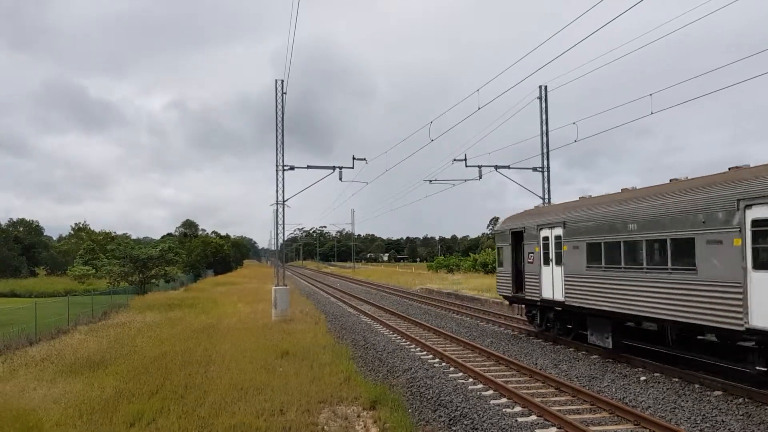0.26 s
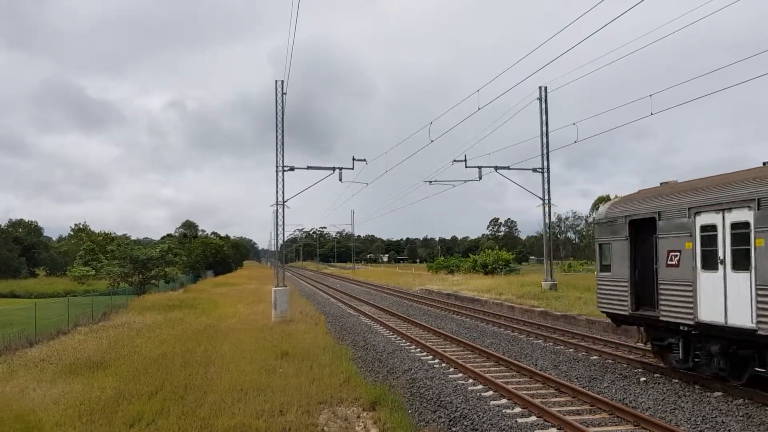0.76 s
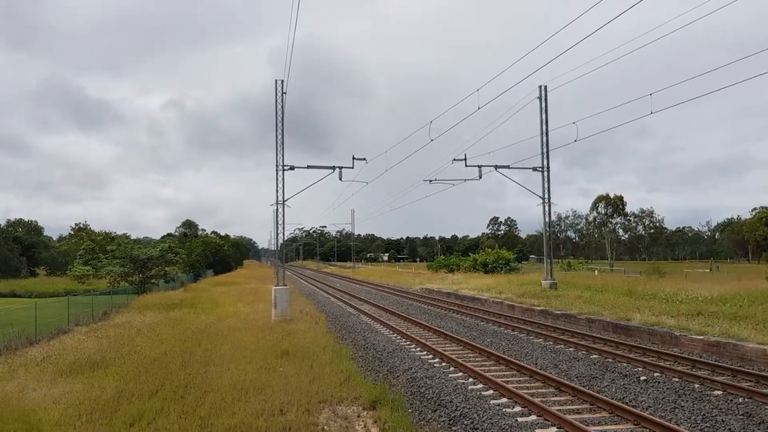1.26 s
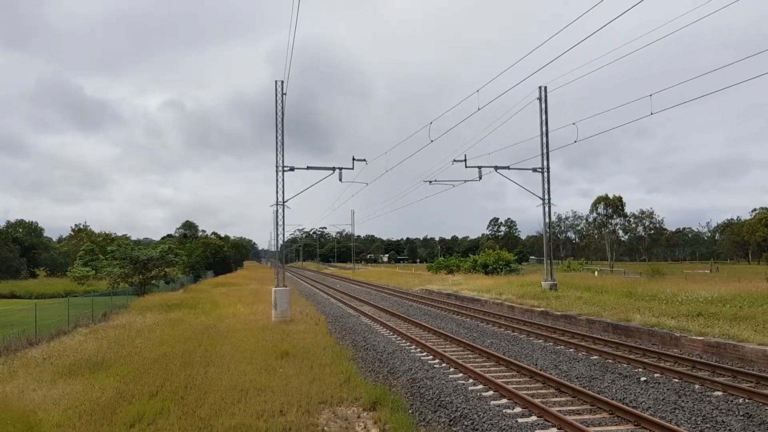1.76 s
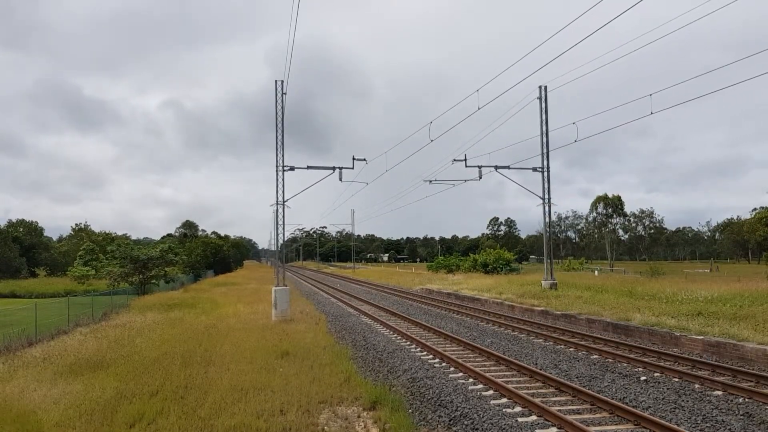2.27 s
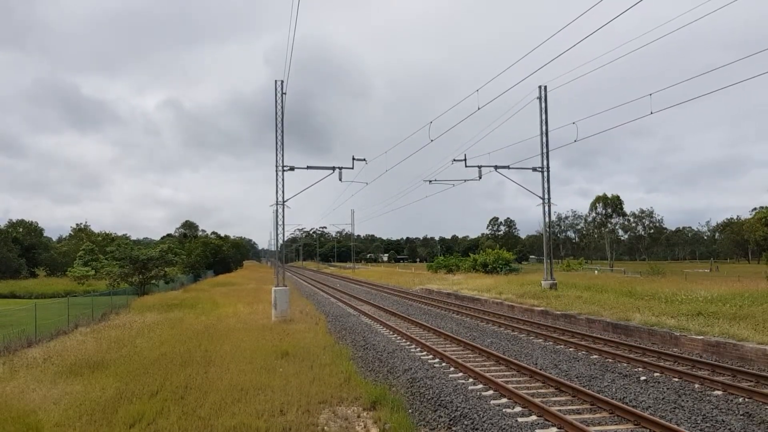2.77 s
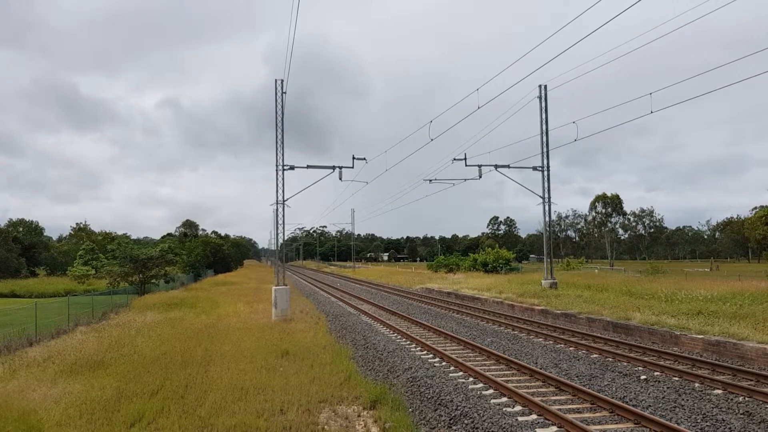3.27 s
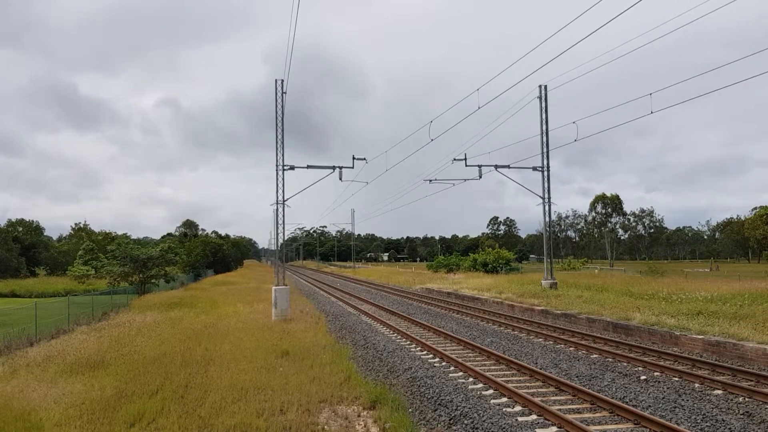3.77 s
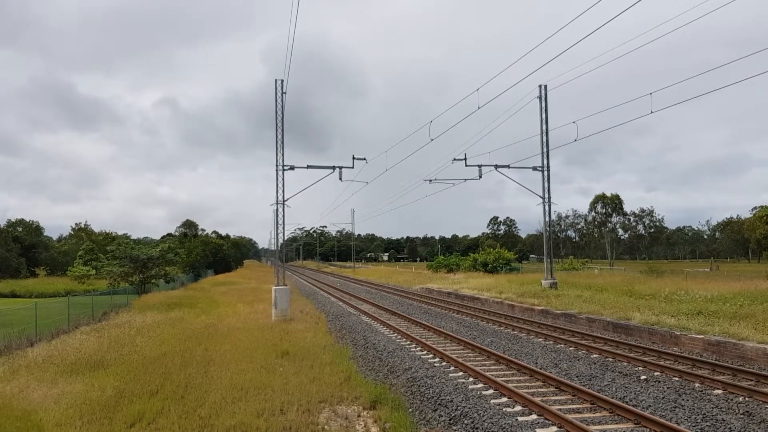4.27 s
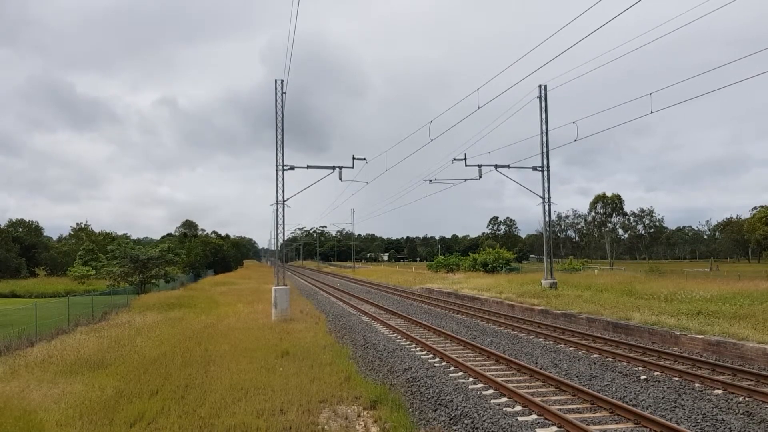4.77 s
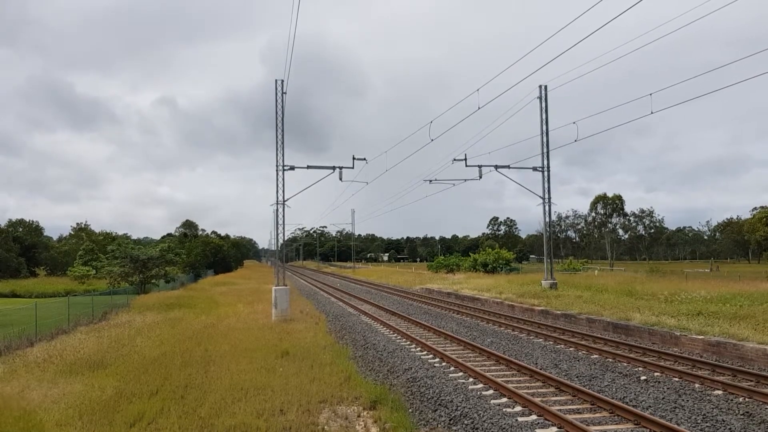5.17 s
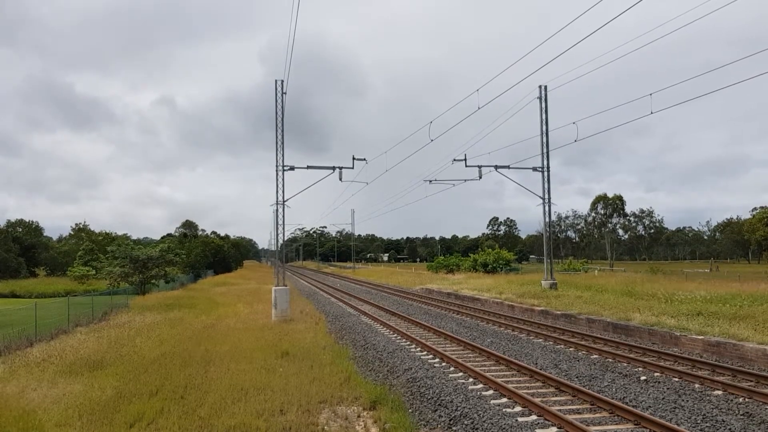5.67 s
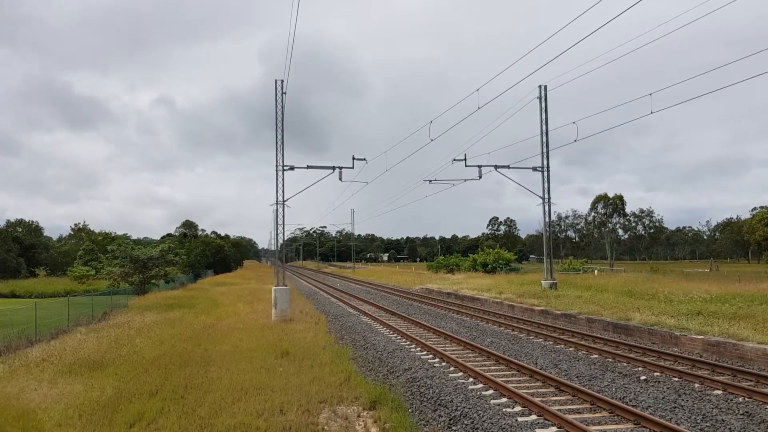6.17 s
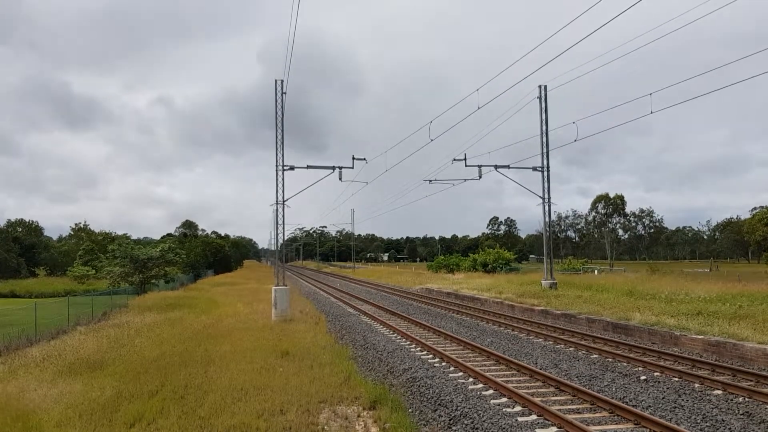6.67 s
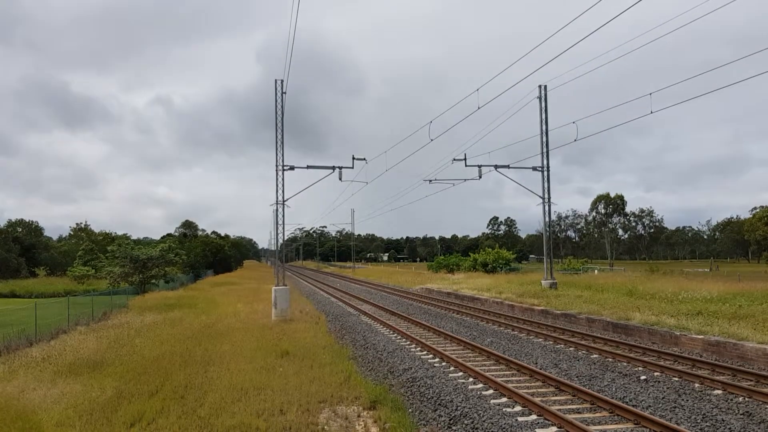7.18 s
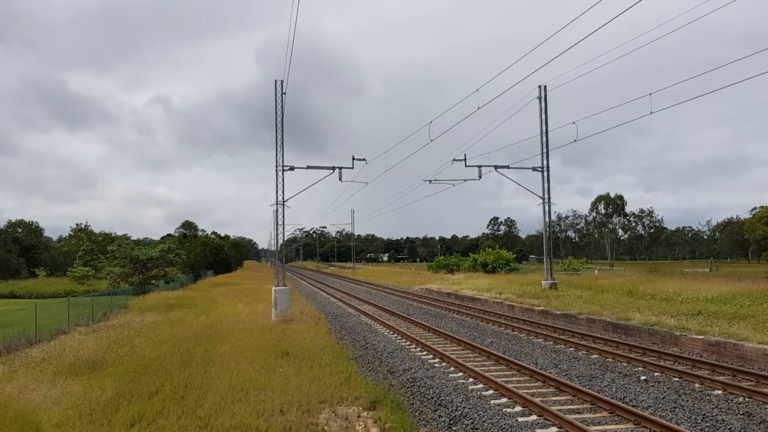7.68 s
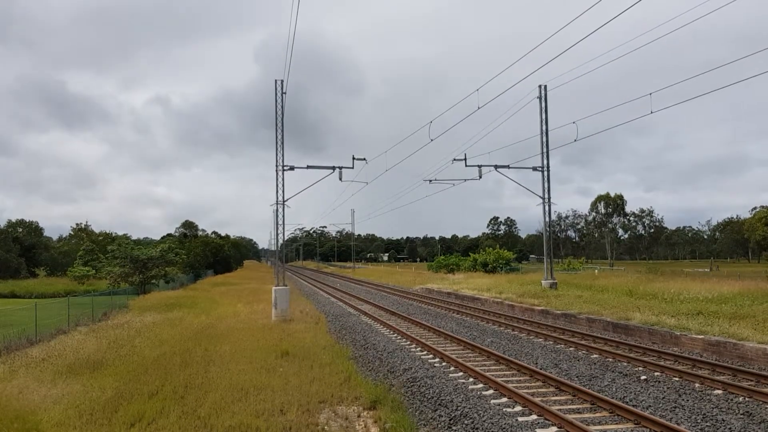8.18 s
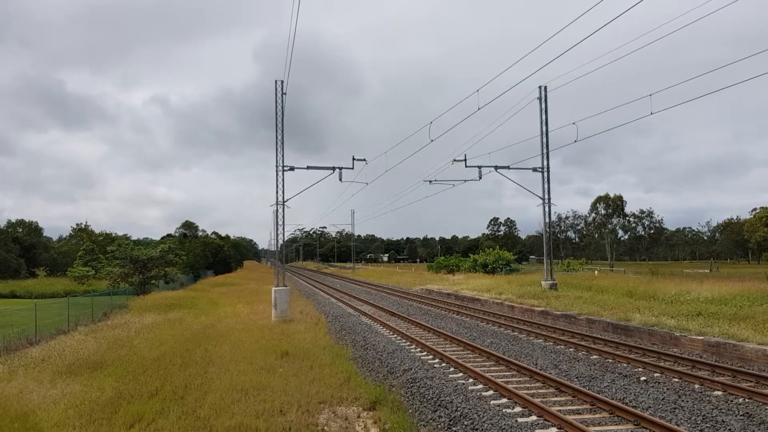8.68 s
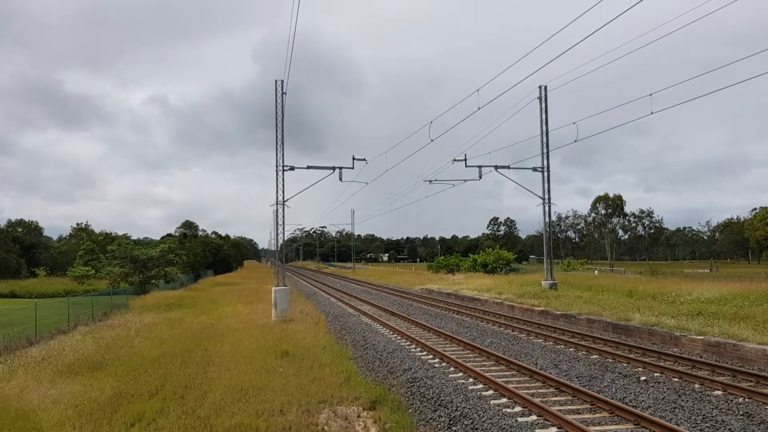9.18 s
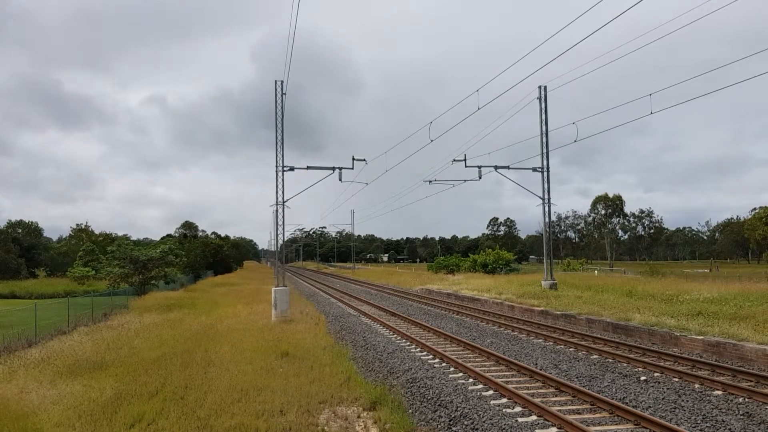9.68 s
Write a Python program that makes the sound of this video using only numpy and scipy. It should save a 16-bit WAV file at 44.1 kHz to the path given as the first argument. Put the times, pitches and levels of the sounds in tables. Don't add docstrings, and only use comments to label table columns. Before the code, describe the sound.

Beside an open grassy railway, the last carriages pass close on the right with heavy rumble, wheel roar, hiss and deep thuds. As the tail passes, a burst of wind thumps the stereo camera microphone. The train fades while rails ring and joints knock; a grasshopper ticks in dry pairs, gusts flutter, and a faint breathy steam whistle begins near the end.

```python
import sys
import numpy as np
from scipy import signal
from scipy.fft import rfft, irfft, next_fast_len
from scipy.io import wavfile
from scipy.ndimage import uniform_filter1d, minimum_filter1d

SR = 44100
rng = np.random.default_rng(int(sys.argv[2]) if len(sys.argv) > 2 else 0)


def bounce(signal):
    frames = np.transpose(np.atleast_2d(signal))
    limited = np.clip(frames, -1, 1)
    pcm = np.round(limited * 32767).astype(np.int16)
    wavfile.write(sys.argv[1], SR, pcm)


def volts_from_db(level):
    exponent = np.asarray(level, float) / 20
    return 10 ** exponent


N = 437913
T = np.arange(N) / SR

# time in seconds, delay of the left port behind the right in samples.
BEARING = [
    (0, 18.4),
    (2.6, 15.8),
    (3.4, 9),
    (4.2, 6.6),
    (9.93, 3.3),
]


def curve(table, t):
    s, *columns = np.transpose(table)
    return [np.interp(t, s, column) for column in columns]


def colour(x, points):
    size = next_fast_len(N)
    hz, db = np.transpose(points)
    log_hz = np.log(np.fft.rfftfreq(size, 1 / SR) + 1)
    gain = volts_from_db(np.interp(log_hz, np.log(np.maximum(hz, 1)), db))
    return irfft(rfft(x, size) * gain, size)[..., :N]


def unit(x):
    return x / np.sqrt(np.mean(x.mean(axis=0) ** 2))


def walk(rate):
    hold = max(int(SR / rate), 1)
    levels = rng.standard_normal(N // 50)[:N // hold + 1]
    slewed = uniform_filter1d(np.repeat(levels, hold), hold)
    slewed = uniform_filter1d(slewed, hold)[:N]
    return slewed / slewed.std()


def ring(x, modes, waver_db):
    out = 0
    for hz, width, db in modes:
        peak = signal.iirpeak(hz, hz / width, SR)
        rung = signal.lfilter(*peak, signal.lfilter(*peak, x))
        out = out + volts_from_db(db + waver_db * walk(18)) * rung
    return out


def blows(events, rise_s, fall_s):
    out, t = np.zeros(N + SR), np.arange(SR // 4) / SR
    envelope = (1 - np.exp(-t / rise_s)) * np.exp(-t / fall_s)
    for s, db, hz in events:
        out[int(s * SR):][:len(t)] += volts_from_db(db) * envelope * np.sin(2 * np.pi * hz * t)
    return out[:N]


def spread(lag, alike_hz, patchy_db, rattle_db, rattle_rate):
    frame = 512
    noise = rng.standard_normal((2, N)) * volts_from_db(rattle_db * walk(rattle_rate))
    hz, s, (a, b) = signal.stft(noise, SR, nperseg=frame)
    alike = np.exp(-(hz[:, None] / alike_hz) ** 1.14)
    late = np.exp(-2j * np.pi * hz[:, None] * np.interp(s, T, lag) / SR)
    patch = uniform_filter1d(rng.standard_normal(a.shape), size=8, axis=1)
    patch = uniform_filter1d(patch, size=8, axis=0)
    ports = np.array([a * late, alike * a + np.sqrt(1 - alike ** 2) * b])
    ports = ports * volts_from_db(patchy_db * patch / patch.std())
    return signal.istft(ports, SR, nperseg=frame)[1][:, :N]


def closeness():
    return np.clip((curve(BEARING, T)[0] - 5.5) / 13, 0, 1)


def follow(top_db, slope, close_db):
    # time in seconds, level in dB.
    rolling = [(0, -18.5), (.3, -18), (.95, -22.5), (1.3, -22.5), (1.8, -26.5), (2.3, -25.5), (2.75, -27),
               (3.1, -32), (3.4, -35.5), (4.06, -35.5), (4.3, -32.5), (4.95, -33), (5.5, -33.5),
               (6.2, -35.5), (7.0, -39), (7.7, -41.5), (8.6, -42.5), (9.93, -47.5)]
    loudest_db = -19
    return top_db + slope * (curve(rolling, T)[0] - loudest_db) + close_db * closeness()


def grasshopper():
    # time in seconds, peak in dB, low mode against the high ones in dB.
    ticks = [(4.4294, -48, -6), (4.591, -41, -5), (5.4922, -43, -8), (6.4087, -46, -5), (6.446, -46, -10),
             (7.359, -45, -3), (7.3961, -52, -15), (7.663, -46, -4), (7.6999, -50, -12), (7.8236, -48, 0),
             (7.8594, -45, -3), (7.9872, -45, -1), (8.0237, -48, -5), (8.1509, -47, -1), (8.1848, -47, -6),
             (8.3145, -49, 2), (8.3514, -45, -5), (9.2993, -51, -1), (9.3357, -46, -8), (9.4629, -47, -2),
             (9.4973, -48, -3), (9.6268, -44, -5), (9.658, -46, -4), (9.8141, -46, -3), (9.847, -45, -8)]
    # (Hz, width Hz, dB)
    wing_low = [(4600, 2200, -1)]
    wing_high = [(6900, 3000, -5), (9600, 3200, -3), (12000, 4500, -6), (14400, 3500, -7.5)]
    rasp_s, rasp_db = 0.046, -16.5
    starts = np.zeros((2, N))
    for s, db, low_db in ticks:
        for ahead_s, gain_db in ((0, 12), (.022, 1), (.036, -4)):
            starts[:, int((s - ahead_s) * SR)] += volts_from_db(db + gain_db + np.array([0, low_db]))
    decay = np.exp(-1 / (.0025 * SR))
    scrape, low = signal.lfilter([1], [1, -decay], starts + 1e-18)
    width = int(2 * rasp_s * SR)
    rasp = uniform_filter1d(uniform_filter1d(scrape, width), width)
    scrape = scrape + volts_from_db(rasp_db) * rasp_s / 0.0029 * rasp
    teeth = rng.standard_normal((2, N))
    return ring(scrape * teeth, wing_high, .2) * volts_from_db(-3.0) + ring(low * teeth, wing_low, .2) * volts_from_db(8.0)


def wind():
    # frequency in Hz, level in dB.
    thump_colour = [(12, -45), (30, -9), (60, 5.5), (100, 6), (160, 3), (300, -6), (600, -61.5),
                    (2000, -80)]
    flutter_colour = [(20, -40), (60, -3), (150, -3), (280, 1.5), (450, -12.5), (900, -28.5), (1800, -30.5),
                      (5000, -102)]
    # time in seconds, flutter peak in dB, left minus right in dB, thump against flutter in dB.
    gust_events = [(2.71, -24, 10, -12), (3.31, -40, -9, -14), (4.5, -47, -5, -15), (4.75, -35.5, -3, -2),
                   (5.15, -34.5, -4, -3), (5.3, -37, -7, -8), (5.51, -54, 2, -6), (6.3, -51, 5, -10),
                   (6.6, -43, -3, -5), (6.87, -40, 1, -2), (7.05, -43, -3, 0), (7.25, -40, -1, -5),
                   (7.36, -32, -1, -18), (7.56, -29, 1, -18), (7.83, -35, 1, -3), (8.38, -33, 0, -23),
                   (8.52, -46, -2, -11), (8.68, -50, -4, -4), (9.07, -39, -1, -10), (9.23, -37, 1, -11),
                   (9.33, -54, 9, -3), (9.43, -39.5, 2, -2), (9.72, -39, 9, -5), (9.9, -32.5, -2, -9)]
    gust_rise_s, gust_fall_s = 0.036, 0.054
    wake_s = (2.68, 2.87, 3.41)
    wake_db, wake_pan_db, wake_fall_db = -18.5, -11, 27
    side = np.array([[.5], [-.5]])
    eddies = rng.standard_normal((2, 2, N)) * volts_from_db(3.4 * np.array([walk(40), walk(40)]))
    breeze = volts_from_db(0.8 * walk(1.9))
    wake_shape_db = np.interp(T, wake_s, (-wake_fall_db / 2, 0, -wake_fall_db))
    wake = volts_from_db(wake_db + wake_shape_db + side * wake_pan_db) * (T < wake_s[2])
    gusts, thumps = np.zeros((2, 2, N))
    for s, db, pan_db, thump_db in gust_events:
        near = slice(int((s - .2) * SR), int((s + .4) * SR))
        late = T[near] - s
        swell = np.exp(-(late / np.where(late < 0, gust_rise_s, gust_fall_s)) ** 2)
        gust = volts_from_db(db + side * pan_db) * swell
        gusts[:, near] += gust
        thumps[:, near] += gust * volts_from_db(thump_db)
    thump = unit(colour(eddies[0], thump_colour)) * (wake + breeze * volts_from_db(-42.5) + thumps)
    flutter = unit(colour(eddies[1], flutter_colour)) * (gusts + breeze * volts_from_db(-41) + wake * volts_from_db(-11))
    return (thump + flutter) * np.clip((T - wake_s[0]) / 0.12, 0, 1)


def pops():
    # time in seconds, peak in dB, push 1 or pull -1, port 0 left or 1 right.
    slap_events = [(2.786, -3, 1, 1), (2.8494, 2, -1, 1), (2.927, 5, 1, 1), (3.133, -12, 1, 1),
                   (3.2737, -3, 1, 1), (3.3078, -5, 1, 1), (4.76, -10, -1, 1), (5.1508, -8, 1, 0),
                   (5.221, -7, -1, 0), (6.3493, -14, -1, 0), (6.8829, -26, 1, 0), (7.1273, -19, 1, 1),
                   (7.227, -17, 1, 0), (7.2426, -11, -1, 0), (7.3752, -17, 1, 0), (7.6395, -10.5, 1, 1),
                   (7.7136, -14, 1, 0), (7.724, -14, -1, 1), (8.286, -12, 1, 0), (8.501, -15, -1, 0),
                   (8.6788, -11.5, 1, 0), (8.93, -14, 1, 0), (9.112, -13, 1, 1), (9.2588, -12, 1, 1),
                   (9.294, -13, 1, 0), (9.321, -12.5, 1, 1), (9.323, -12, 1, 0), (9.3286, -15, 1, 0)]
    # frequency in Hz, level in dB.
    slap_colour = [(15, -45), (60, -8), (200, 6.5), (400, 1), (900, -18.5), (1600, -24), (3000, -57),
                   (6000, -88)]
    rebound_s, rebound = .002, 0.46
    slaps = np.zeros((2, N))
    for s, db, sign, port in slap_events:
        slaps[int(port > .5), int(s * SR)] = np.sign(sign) * volts_from_db(db + 28.5)
    slaps = slaps - rebound * np.roll(slaps, int(rebound_s * SR), axis=1)
    return colour(slaps + 1e-9 * rng.standard_normal((2, N)), slap_colour)


def whistle():
    # time in seconds, pitch in Hz, level in dB.
    blast = [
        (8.64, 418, -70),
        (8.71, 424, -37),
        (8.95, 431, -37.5),
        (9.3, 435, -39.5),
        (9.6, 437, -40),
        (9.85, 438, -41.5),
        (9.93, 438, -53),
    ]
    # multiple of the pitch, level in dB.
    partials = [(1, 0), (2, -25), (3, -15), (4, -23)]
    hz, db = curve(blast, T)
    phase = 2 * np.pi * np.cumsum(hz * (1 + .002 * walk(20))) / SR
    settling_s = np.maximum(T - 8.8, 0)
    tone = 0
    for multiple, partial_db in partials:
        fade_db = 3.5 * (multiple - 1) * settling_s
        tone = tone + volts_from_db(partial_db + .8 * walk(12) - fade_db) * np.sin(multiple * phase)
    tone = tone * volts_from_db(db + 3)
    return np.array([np.roll(tone, 5), tone]) * (T > 8.64)


def ground():
    # frequency in Hz, level in dB.
    soil = [(15, -44), (30, -20), (55, -13), (85, -3), (110, -3.5), (160, 0), (400, -83)]
    end_s, fade_s = 3.22, 0.49
    shudder = unit(colour(spread(np.full(N, 19.), 3000, 1.2, 2.6, 15), soil))
    return shudder * volts_from_db(-30.5 + 4 * T) * np.clip((end_s - T) / fade_s, 0, 1)


def rails():
    # frequency in Hz, width in Hz, level in dB.
    modes = [(1135, 67, 2), (1214, 51, 0.5), (1338, 150, -15), (1368, 114, -6), (1480, 73, 1.5),
             (2075, 130, -4), (2132.4, 99, 0), (2244, 160, -5), (2326, 280, -13.5), (2862, 94, -12.5),
             (3400, 110, -19.5), (3785, 95, -17.5), (4230, 66, -35), (4900, 300, -29)]
    # time in seconds, peak in dB.
    joints = [(3.986, -26), (4.426, -17), (4.5133, -16.5), (4.6211, -36), (4.7138, -16), (4.9358, -41),
              (5.2122, -13), (5.3419, -17.5), (5.7111, -35), (5.9924, -19), (6.1251, -15), (6.2768, -26)]
    shake = spread(np.full(N, 20.6), 6100, 1.54, 1.2, 30)
    web = unit(ring(shake, modes[:5], 1.9))
    wheel = unit(ring(shake, modes[7:9], 2.2))
    head = unit(ring(shake, modes[5:7] + modes[9:], 1.55))
    singing = web * volts_from_db(follow(-33, 0.75, -3))
    singing = singing + head * volts_from_db(follow(-22.5, 1.013, -3.5))
    singing = singing + wheel * volts_from_db(follow(-23, 1.5, -9))
    return singing + blows([(s, db - 2.5, 2140) for s, db in joints], 0.0068, 0.012)


def train():
    # frequency in Hz, level close by in dB, level far off in dB.
    body = [(25, -60, -63), (70, -18, -15), (99.5, -15, 0), (135.4, -1, -1), (174, -6, -5), (187, 2, -0.5),
            (254, 0.5, 2), (270, -1, 2.5), (356, -5, 2.5), (442, -4.5, 3), (490, -14.5, -7.5),
            (750, -61, -12.5), (2000, -80, -83)]
    roar = [(200, -18, -52), (506, 3.5, 1.5), (720, -0.5, 2.5), (895, 0, 3), (980, -3, -2.5),
            (1350, -14.5, -3.5), (1624, -1, -11), (1620, -6.5, -7.5), (1880, -5.5, -11), (2090, -24, -10),
            (2215, -2.5, -32), (2356, -10, -8), (2750, -45, -13), (6000, -70, -70)]
    hiss = [(900, -53, -54), (1770, -0.5, -26), (2530, 0.5, 3.5), (3320, -6, 5), (4110, -4, 1),
            (4500, -8.5, -4), (5970, -15, -6), (6890, -20, -18), (10100, -55, -50)]
    air = [(3000, -54, -52), (6000, -6, -10), (7140, -13, 3.5), (8660, -1, -5.5), (10400, -1.5, 2),
           (11400, -3, -2), (13000, -3, -2.5), (14600, -12, -4), (16000, -13, -7)]
    # time in seconds, gain in dB, length in seconds.
    booms = [
        (.6, 3.5, 0.32),
        (1.046, 4, 0.074),
        (2.045, 4.5, 0.47),
        (4.95, 3.5, 0.38),
        (6.207, 2, 0.15),
        (6.75, 0.5, .15),
        (8.1, 1.5, .2),
    ]
    # time in seconds, peak in dB, ringing in Hz.
    thud_events = [
        (0.139, -6, 272),
        (0.285, -16, 199),
        (0.445, -1, 125.3),
        (0.569, -20, 254),
        (0.9, -5.5, 177.6),
        (1.182, -8.5, 204),
        (1.278, -9.5, 145),
        (1.559, -8, 182.4),
        (2.379, -14, 132),
        (2.584, -7, 137),
    ]
    lag, close = curve(BEARING, T)[0], closeness()
    boom_db = sum(db * np.exp(-((T - s) / long_s) ** 2) for s, db, long_s in booms)
    grass = volts_from_db(-70.5 + 5 * np.exp(-((T - 5.7) / 1) ** 2))
    # (colour, level, lag, alike up to Hz, patchy dB, rattle dB, rattle rate per s)
    parts = [(body, volts_from_db(follow(-15, 0.98, -0.38) + boom_db), 0.66 * lag, 4500, 1.1, 1.2, 25),
             (roar, volts_from_db(follow(-25.5, 0.9, 7.5)), lag, 4200, 1.3, 1.5, 32),
             (hiss, volts_from_db(follow(-42, 0.69, 15.23)), lag, 3600, 1.1, .8, 40),
             (air, volts_from_db(follow(-54, 0.95, 6.7)) + grass, lag, 3600, .8, .9, 40)]
    out = 0
    for points, gain, late, alike_hz, patchy_db, rattle_db, rate in parts:
        noise = spread(late, alike_hz, patchy_db, rattle_db, rate)
        near = unit(colour(noise, np.array(points)[:, [0, 1]]))
        far = unit(colour(noise, np.array(points)[:, [0, 2]]))
        out = out + (close * near + (1 - close) * far) * gain
    thuds = blows([(s, db - 0.5, hz) for s, db, hz in thud_events], 0.0093, .03)
    return out + np.array([np.roll(thuds, 20), thuds])


def scene():
    # frequency in Hz, left minus right in dB.
    shade = [(60, -0.5), (300, 0.5), (700, 1.5), (1900, 3), (3200, 3), (4900, 2), (6200, 3.5), (7600, 0.5),
             (8800, -7), (10500, -3.5), (13000, 0)]
    left_share = 0.53
    left, right = train() + rails() + whistle() + grasshopper()
    left = colour(left, [(hz, left_share * db) for hz, db in shade])
    right = colour(right, [(hz, -left_share * db) for hz, db in shade])
    return np.array([left, right]) + ground() + wind() + pops()


def low_pass(x):
    return signal.sosfilt(signal.butter(12, 15830, fs=SR, output="sos"), x)


def record(dry):
    # frequency in Hz, level in dB.
    cavities = [(6800, 0.5), (7600, 0), (8000, -4), (8400, -0.5), (9000, 1.5)]
    top_cut = [(15720, 0), (15860, -40)]
    x = colour(colour(dry, cavities), top_cut)
    gain = minimum_filter1d(1 / np.maximum(np.abs(x).max(axis=0), 1), size=441)
    return low_pass(x * uniform_filter1d(gain, size=441))


dry = scene()
out = record(dry)
bounce(out)
```